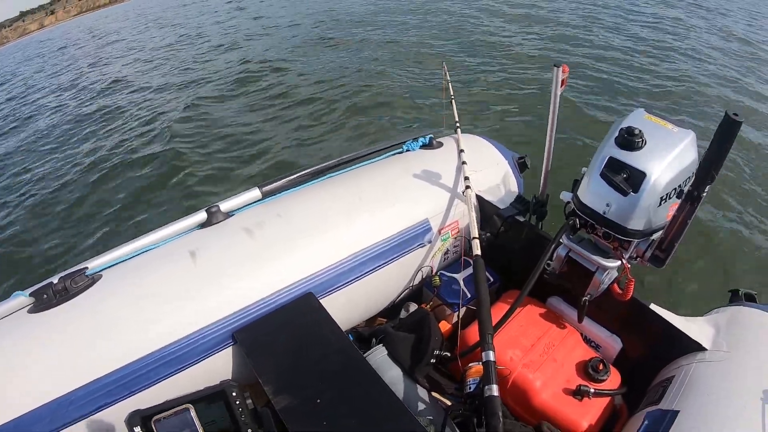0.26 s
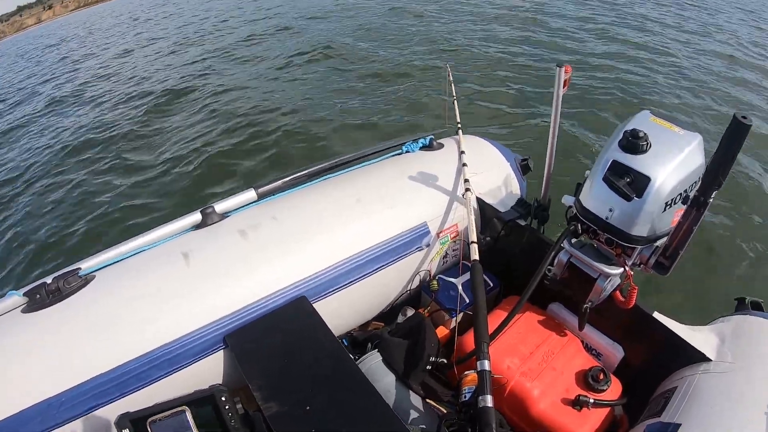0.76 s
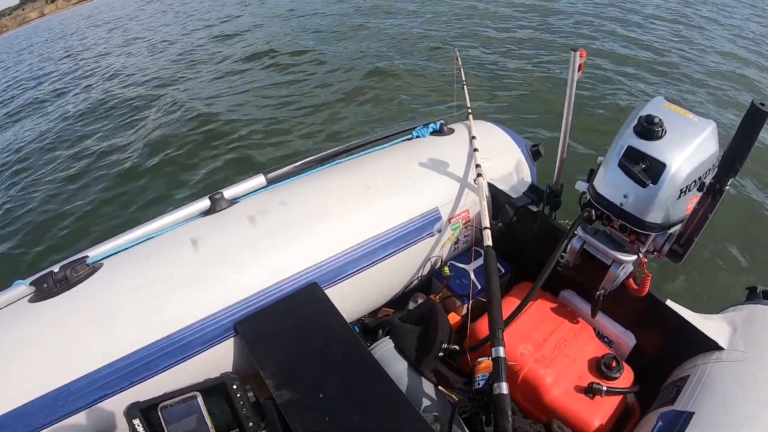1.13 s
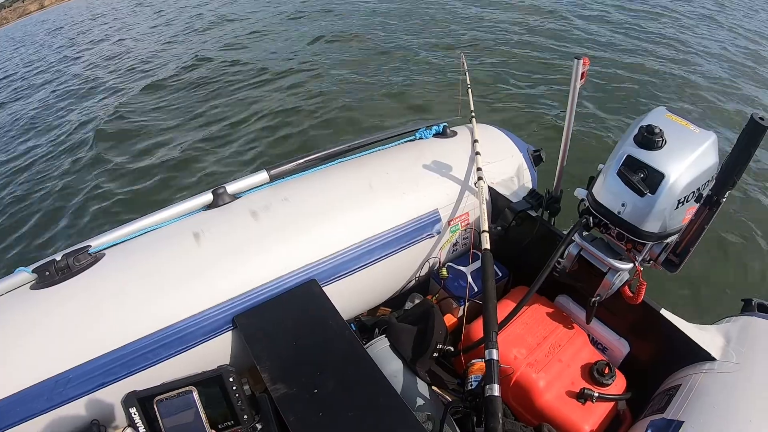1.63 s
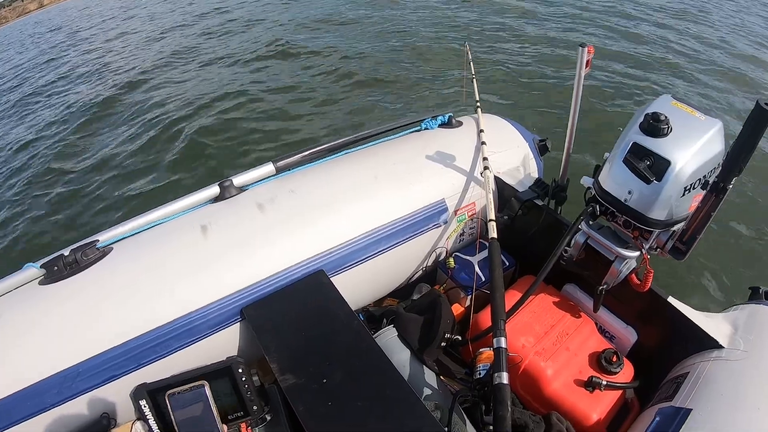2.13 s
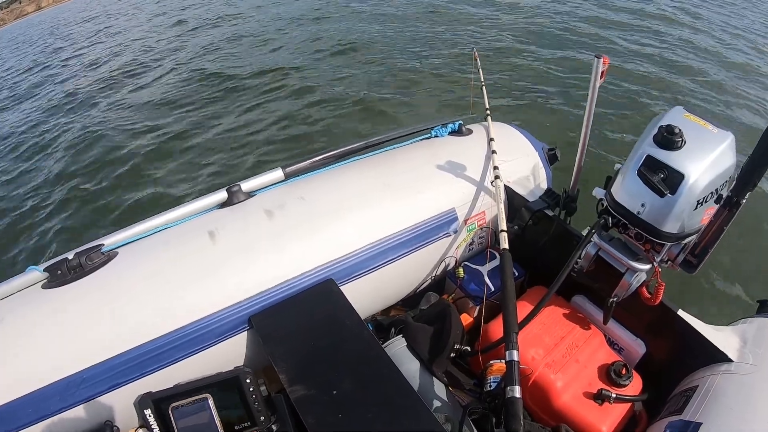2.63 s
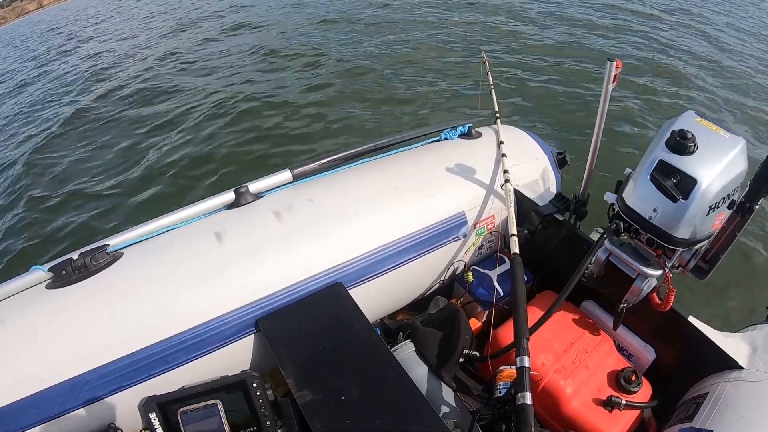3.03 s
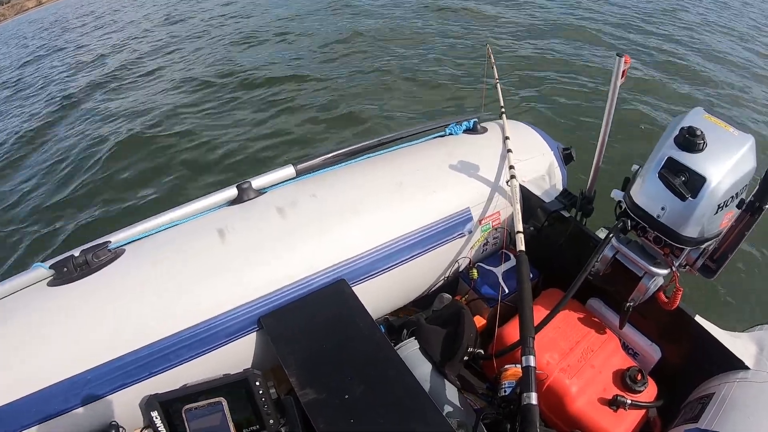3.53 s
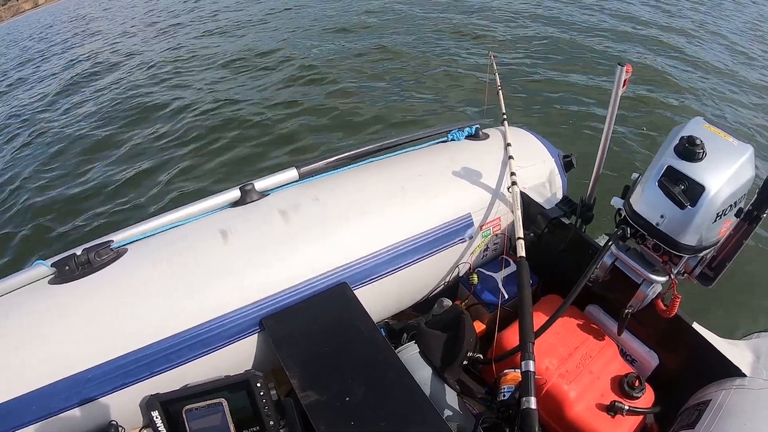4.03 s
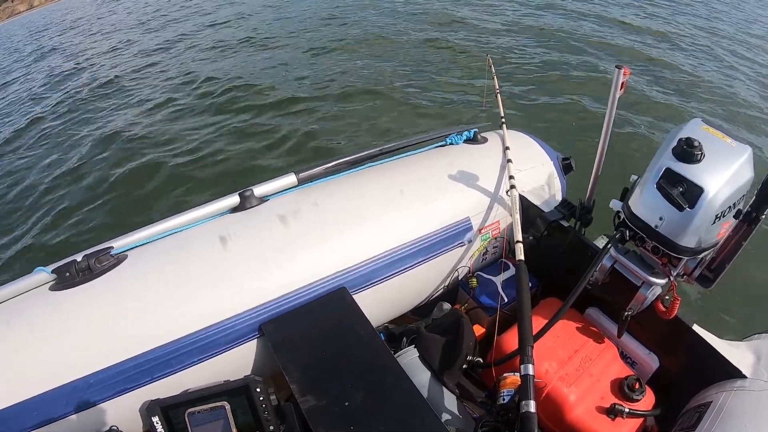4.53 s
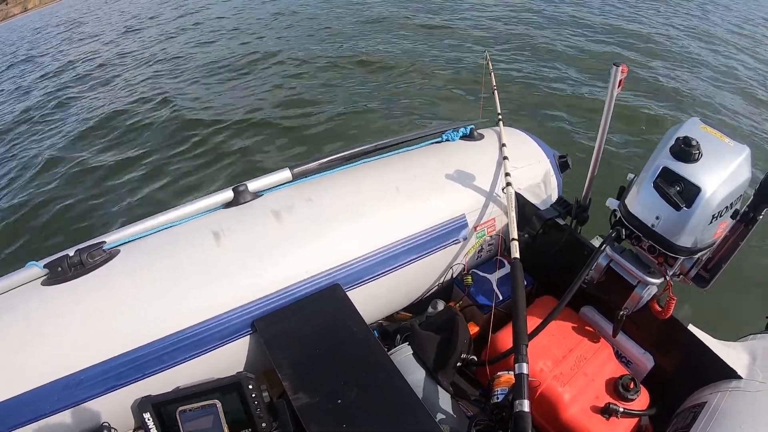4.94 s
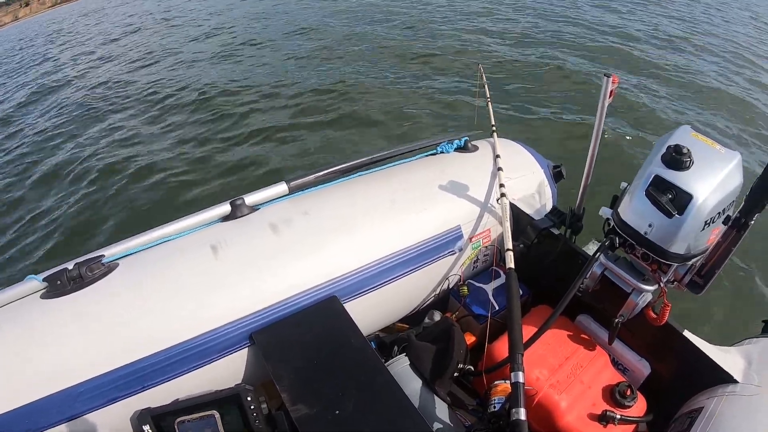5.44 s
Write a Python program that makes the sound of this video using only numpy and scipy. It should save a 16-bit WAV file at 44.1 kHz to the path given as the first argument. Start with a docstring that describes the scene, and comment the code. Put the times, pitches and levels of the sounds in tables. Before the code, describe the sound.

Three deep, ringing plops strike river water with splashing spray and bubbles, then small waves gulp softly under a boat hull.

```python
"""A paddle strikes a river three times beside an inflatable boat, with the water to the right.
Before each stroke a short hiss swells; then a torn burst of noise meets a ringing, rising plop.
Spray made of ticks, tiny ringing bubbles and fizz follows, with single bubbles, drops and soft thuds.
Then three small waves gulp under the hull as low wavering tones with slosh and spit.
A filtered-noise river, a faint low hum and a thin high hiss run throughout."""
import sys
import numpy as np
from scipy import signal
from scipy.fft import rfft, irfft
from scipy.io import wavfile
from scipy.ndimage import uniform_filter1d

SR = 44100
rng = np.random.default_rng(int(sys.argv[2]) if len(sys.argv) > 2 else 0)


def store_pcm(level_fs):
    """Save levels as 16-bit WAV."""
    pcm = np.round(np.clip(level_fs, -1, 1) * 32767).astype(np.int16)
    wavfile.write(sys.argv[1], SR, np.atleast_2d(pcm).T)


N = 250929
T = np.arange(N) / SR  # s
FREQ = np.maximum(np.fft.rfftfreq(N, 1 / SR), 1)  # Hz


def undb(db):
    """Turn decibels into a gain."""
    return 10 ** (np.asarray(db) / 20)


def unit(x):
    """Scale to rms 1."""
    return x / np.sqrt(np.mean(x ** 2))


def spectrum(points):
    """Read the gain at every frequency from (f/Hz, level/dB) points."""
    hz, db = np.transpose(points)
    return undb(np.interp(np.log(FREQ), np.log(np.maximum(hz, 1)), db))


def colour(x, gain):
    """Filter by a gain at every frequency."""
    return irfft(rfft(x) * gain, N)


def add(out, s, x):
    """Mix x into out from time s."""
    i = max(int(s * SR), 0)
    out[i:i + len(x)] += x[:max(N - i, 0)]


def hump(x):
    """A smooth bell shape, 1 at x = 0."""
    return np.exp(-np.minimum(x ** 2, 20))


def walk(rate):
    """Random levels held 1 / rate s and smoothed twice; spread near 1."""
    k = int(SR / rate)
    steps = np.repeat(rng.standard_normal(N // k + 1), k)
    return 1.3 * uniform_filter1d(uniform_filter1d(steps, k), k)[:N]


def crackle(rate, spread_db):
    """Tiny clicks of very unequal size, on average rate per second."""
    hit = rng.random(N) < rate / SR
    size_db = spread_db * np.minimum(rng.exponential(size=N), 2 * np.e)
    return hit * rng.choice([-1, 1], N) * undb(size_db)


def bubble(hz, decay, glide, onset):
    """A bubble's ring climbs by glide octaves/s and dies ever faster as it nears the surface."""
    t = np.arange(int(np.pi * decay * SR)) / SR
    size = np.exp(-(t / decay) ** np.sqrt(2)) * (1 - np.exp(-t / onset))
    return np.sin(2 * np.pi * np.cumsum(hz * 2 ** (glide * t)) / SR) * size


# air cavities dragged down by the paddle:
# (t/s of sealing, first f/Hz, final f/Hz, glide/s, nominal level/dB, decay/s, life/s)
CAVITIES = [(.279, 166.5, 782, 0.12, -1.5, 0.03, .064), (1.179, 201, 524, .025, -0.93, 0.018, .034),
            (2.0615, 226, 469.4, .012, -2.5, 0.012, 0.031)]


def plops():
    """The open cavity heaves slowly; once sealed it rings, rises in pitch and bursts at the surface."""
    open_hz, open_share = 95, .1
    draw, seal, burst = .011, .0008, .003  # s
    out = np.zeros(N)
    for s, first_hz, final_hz, glide, db, decay, life in CAVITIES:
        t = np.arange(-SR // 20, SR // 10) / SR
        age = np.maximum(t, 0)
        sealed = (1 + np.tanh(t / seal / 2)) / 2
        ring_hz = final_hz + (first_hz - final_hz) * np.exp(-age / glide)
        phase = 2 * np.pi * np.cumsum(open_hz + (ring_hz - open_hz) * sealed) / SR
        heave = (1 - sealed) * open_share * np.exp(-(t / draw) ** 2)
        size = heave + sealed * np.exp(-age / decay)
        size = size * (1 - np.tanh((t - life) / burst / 2)) / 2
        # the wave is at its crest as the neck closes
        add(out, s + t[0], undb(db) * size * np.cos(phase - np.interp(0, t, phase)))
    return out


# tone of torn water: (f/Hz, relative level/dB)
TEAR = [(240, -36.5), (400, -8), (935, -2.5), (1220, -9.5), (1490, -7), (1820, -12), (2250, -10),
        (2550, -15), (3070, -13.5), (3870, -24.5), (4440, -17.5), (6150, -19.5), (7990, -19), (9920, -41.5),
        (16000, -59.5)]


def splash(s, db, rise, decay, tilt_db, tail_db, tail):
    """Water torn open: a burst of spiky broadband noise with a brief wet tail."""
    t = np.arange(-SR // 10, 4 * SR // 10) / SR
    before, after = np.maximum(-t, 0), np.maximum(t, 0)
    fade = np.exp(-after / decay) + undb(tail_db) * np.exp(-after / tail)
    burst = np.exp(-before / rise) * fade
    hz = np.fft.rfftfreq(len(t), 1 / SR)
    gain = np.interp(hz, *np.transpose([(f, undb(level)) for f, level in TEAR]))
    gain = gain * undb(tilt_db * np.log2(np.clip(hz, 400, 9000) / 1000))
    spikes = rng.standard_normal(len(t)) ** 3
    sound = undb(db) * burst * unit(irfft(rfft(spikes) * gain, len(t)))
    # skip whatever falls before time zero
    skip = max(int(-(s + t[0]) * SR), 0)
    out = np.zeros(N)
    add(out, s + t[0], sound[skip:])
    return out


# paddle strokes and their spray: (t/s, nominal level/dB, rise/s, decay/s, tilt in dB per octave,
# churn level/dB, spray flight/s, falling spray level/dB, fizz level/dB); spray levels before clumping
STROKES = [(0.2722, -15.5, 0.0041, 0.0045, 0, -29, 0.2, -38, -54),
           (1.169, -17, 0.0053, 0.004, 0, -40, 0.2, -47, -59.5),
           (2.047, -16.5, 0.0039, 0.005, -2, -36, 0.22, -51.5, -60.5)]


def blade():
    """The blade tears the surface in a short noisy burst at each stroke."""
    return sum(splash(*row[:5], tail_db=-20, tail=.035) for row in STROKES)


# tone of pattering drops: (f/Hz, relative level/dB)
PATTER = [(240, -30.5), (400, 4), (440, -5), (623, -10), (801, -4.5), (925, -9), (1020, -5.5), (1720, -3.5),
          (2820, -6.5), (4040, -10.5), (7000, -18), (9100, -46.5), (15400, -120)]


def beads(cycles, spread_db=4.5, glide=18, count=2400):
    """A steady shower of tiny bubbles of unequal size, each ringing a few cycles; rms 1."""
    out = np.zeros(N)
    for when, size, chance in rng.random((count, 3)):
        hz = 600 * 6 ** size
        level = undb(-spread_db * np.log(chance + 0.018))
        add(out, when * N / SR, level * bubble(hz, cycles / hz, glide, 1 / hz))
    return unit(colour(out, spectrum(PATTER)))


# tone of the foam: (f/Hz, relative level/dB)
FIZZ = [(2940, -36.5), (5000, -8), (5510, -4), (6130, -8), (7940, 0.5), (9010, -5), (9930, -19),
        (12400, -24), (16000, -40.5)]


def spray():
    """Hiss swells as the blade enters; churn dies away, spray lands in a shower and foam lingers."""
    entry_patter_db, entry_fizz_db, foam_db = -54.5, -45, -5  # foam relative to the shower's fizz
    entry_patter_s, entry_fizz_s, churn_s, shower_s, foam_s = .14, .04, .038, .14, .5
    fall, foam = np.zeros(N), np.zeros(N)
    for s, *_, churn_db, flight, shower_db, fizz_db in STROKES:
        away, struck = np.abs(T - s), T >= s
        shower = hump((T - s - flight) / shower_s)
        falling = undb(churn_db) * np.exp(-away / churn_s) + undb(shower_db) * shower
        fall += np.where(struck, falling, undb(entry_patter_db) * np.exp(-away / entry_patter_s))
        fizzing = undb(fizz_db) * (shower + undb(foam_db) * np.exp(-away / foam_s))
        foam += np.where(struck, fizzing, undb(entry_fizz_db) * np.exp(-away / entry_fizz_s))
    # dry ticks, short beads, longer plips and a gurgle
    drops = undb(-8) * unit(colour(crackle(1500, 3), spectrum(PATTER)))
    drops += undb(-5) * beads(cycles=2.5)
    drops += undb(-3) * beads(cycles=6, count=2600)
    drops += undb(-10) * beads(cycles=19, spread_db=2, glide=12, count=330)
    # each size of foam bubble pops in its own band
    pops = np.zeros(N)
    for hz in np.geomspace(3500, 14000, 6):
        pops += colour(crackle(900, 3.3), np.exp(-np.log2(FREQ / hz) ** 2 * 16))
    clumps = undb(1.99 * walk(100))  # the spray falls in clumps
    return (fall * drops + foam * unit(colour(pops, spectrum(FIZZ)))) * clumps


# the largest single bubbles, and at 0.271, 1.167 and 2.044 s the ringing mouth of each torn cavity: # (t/s,
# starting f/Hz, level/dB before gain and fade-in, decay/s)
BUBBLES = [(.170, 1330, -37.5, .006), (0.271, 1440, -27, .004), (.346, 498, -29, .018),
           (.368, 592, -27, 0.013), (.524, 1040, -34, .007), (.612, 1660, -35, 0.02),
           (.863, 1290, -39.5, 0.0093), (1.042, 2196, -44.5, 0.0067), (1.167, 2450, -15, .0025),
           (1.215, 492, -33.5, .019), (1.273, 2120, -27, 0.0032), (1.344, 788, -33.5, 0.014),
           (1.437, 590, -41, 0.027), (1.464, 1520, -36, 0.0054), (1.496, 603, -43, 0.027),
           (1.510, 1180, -33, 0.0038), (2.044, 879, -17.5, .008), (2.104, 1205, -35, .01),
           (2.225, 1630, -41, 0.0046), (2.254, 2100, -37.5, 0.0063), (2.296, 1690, -44, 0.0055),
           (2.334, 1205, -40, 0.0055), (2.325, 2650, -41.5, .005), (2.355, 1260, -36.5, 0.01),
           (3.140, 660, -39, 0.019), (4.078, 1130, -47.5, 0.0088), (4.225, 1070, -40, .011),
           (4.265, 775, -41, 0.028), (5.147, 1180, -39.5, .007), (5.205, 1142, -39.5, .009),
           (5.241, 684, -35.5, 0.0072), (5.331, 710, -45.5, 0.022), (5.377, 1335, -33.5, 0.0093),
           (5.429, 775, -44, 0.0088)]


def bubbles():
    """Larger bubbles pinch off with a soft wet tick, climb in pitch and flutter as they rise."""
    climb = 5.5  # octaves per second
    gain_db, flutter_db, pinch_db, pinch_s = 1, 2, -19, .016
    rings, ticks = np.zeros(N), np.zeros(N)
    for s, hz, db, decay in BUBBLES:
        add(rings, s, undb(db) * bubble(hz, decay, climb, decay / 6))
        add(ticks, s, undb(db) * np.exp(-T[:SR // 20] / pinch_s))
    # the wobbling bubble wall jitters the pitch
    rings = np.interp(T + .00008 * walk(280), T, rings)
    wet_noise = unit(colour(crackle(8000, 1.5), spectrum(PATTER)))
    return rings * undb(gain_db + flutter_db * walk(250)) + undb(pinch_db) * ticks * wet_noise


# heavy drops landing on the river: (t/s, nominal level/dB, tilt in dB per octave)
DROPS = [(.085, -48.5, 3), (.146, -47.5, 3), (0.201, -40, 4), (0.372, -39.5, 6), (0.448, -32.5, 13),
         (0.495, -37.5, -4.5), (0.609, -30.5, 5), (1.3447, -35, -1.5), (1.598, -45, 4.5),
         (1.935, -42.5, 12.5), (2.007, -38.5, 7.5), (2.139, -43.5, 4.5), (2.266, -34.5, 5),
         (2.297, -40, 5.5), (2.409, -45.5, 1.5)]


def splats():
    """Heavy drops tear the surface in small splashes, each with its own brightness."""
    rise, decay = .0011, .0036  # s
    return sum(splash(s, db, rise, decay, tilt_db, tail_db=-20.5, tail=.04) for s, db, tilt_db in DROPS)


# air gulping under the hull as three waves pass:
# (t/s of the crest, f/Hz before wobble, boom level/dB, slosh level/dB)
GULPS = [(2.952, 169, -31, -38.5), (2.975, 171, -28, -46.5), (3.017, 181, -29, -37),
         (3.039, 174, -29, -45.5), (3.073, 161, -35.5, -44), (3.109, 150, -41, -49),
         (4.146, 155, -33.5, -49.5), (4.173, 107, -36, -53.5), (4.2, 146, -25.5, -50),
         (4.23, 152, -30.5, -47.5), (4.277, 150, -34, -61), (4.311, 160, -36.5, -64),
         (5.166, 140, -28.5, -52), (5.197, 145, -29.5, -53), (5.237, 139, -25.5, -47.5),
         (5.261, 139, -26.5, -42.5), (5.292, 139, -31.5, -67)]
# small wavelets lapping at the tube: (t/s, level/dB, decay/s)
LAPS = [(.718, -41, 0.038), (1.755, -57.5, .04), (1.915, -47, 0.017), (2.733, -47.5, 0.019)]
# tone of the slosh: (f/Hz, relative level/dB)
SLOSH = [(15, -74), (25, -32.5), (65, -20.5), (151, -12), (301, -16.5), (404, -21), (469, -22),
         (614, -57.5), (695, -25), (981, -31.5), (1140, -38), (1570, -55.5), (9000, -63), (11700, -87.5),
         (19800, -120)]


def hull():
    """Wavelets squeeze an air pocket under the tube: it booms while water sloshes, spits and runs off."""
    gulp_rise, gulp_fall, lap_rise, runoff_s = .011, .016, .0045, .12  # s
    spit_db, runoff_db = -10, -16  # relative to the slosh
    boom, wet, laps = np.zeros(N), np.zeros(N), np.zeros(N)
    for s, _, db, wet_db in GULPS:
        push = hump(np.maximum((s - T) / gulp_rise, (T - s) / gulp_fall))
        boom += undb(db) * push
        wet += undb(wet_db) * push
    for s, db, decay in LAPS:
        laps += undb(db) * np.exp(-np.minimum(np.maximum((s - T) / lap_rise, (T - s) / decay), 20))
    times, pitches = np.transpose(GULPS)[:2]
    hz = np.interp(T, times, pitches) * (1 + .055 * walk(70))
    tone = np.sin(2 * np.pi * np.cumsum(hz) / SR)
    slosh = unit(colour(crackle(3300, 3.5), spectrum(SLOSH)))
    # the run-off repeats the slosh's swell a little later
    spit = undb(spit_db) * (wet + laps) + undb(runoff_db) * np.interp(T - runoff_s, T, wet)
    return boom * tone + (wet + laps) * slosh + spit * beads(cycles=3.8, count=3600)


# wavelets slapping the tube: (t/s, nominal level/dB)
SLAPS = [(1.692, -46), (2.9462, -28.5), (3.007, -30.5), (3.0404, -34), (3.066, -44), (4.209, -46.5),
         (4.391, -57), (5.035, -42), (5.379, -41.5)]


def slaps():
    """Wavelets slap the tube in very short bursts of torn-water noise."""
    rise, decay, tilt_db = .00031, .002, -2.5  # s, s, dB per octave
    return sum(splash(s, db, rise, decay, tilt_db, tail_db=-20, tail=.06) for s, db in SLAPS)


# dull thuds of the boat's floor: (t/s, f/Hz, level/dB, half length/s)
KEEL = [(2.111, 136, -35, 0.04), (2.187, 54.5, -55, 0.033), (3.062, 78, -36.5, 0.013),
        (3.13, 66.5, -51, 0.035)]


def thuds():
    """The boat's soft floor booms briefly, as low tones, when water heaves against it."""
    out = np.zeros(N)
    for s, hz, db, width in KEEL:
        out += undb(db) * hump((T - s) / width) * np.sin(2 * np.pi * hz * (T - s))
    return out


# tone of the open water: (f/Hz, relative level/dB)
RIVER = [(15, -53.5), (25, -17.5), (74, -20.5), (114, -29), (141, -11), (195, -4.5), (236, -9.5),
         (285, -10), (309, -25.5), (363, -14.5), (439, -29), (545, -20), (2550, -39), (8360, -46.5),
         (16000, -63.5)]
# stereo width of the open water: (f/Hz, side against mid level/dB)
RIVER_SIDE = [(60, -5.5), (110, -9), (200, -11.5), (380, -6), (700, 6), (1290, 3.5), (2380, -1),
              (4400, -4.5), (8120, -1.5), (15000, 2)]
# the faint hum: (f/Hz before wobble, level/dB before the hum's trim, waver and swell)
HUM = [(199.2, -74.5), (360.7, -81), (479.1, -89), (559.9, -92.5)]
# rise and fall of river, hum and hiss together: (t/s, level/dB)
SWELL = [(0, 3), (1, -3.5), (1.8, -3.5), (2.4, 1.5), (3.3, 0), (5.69, -1.5)]


def river():
    """A wide wash of rippling filtered noise, a faint wavering hum and a thin high hiss."""
    wash_db, ripple_db, hum_db, waver_db, hiss_db = -64.5, 1.8, -2, 3, -90  # before the swell
    hiss_hz, hiss_width_hz = 8300, 550

    def wash():
        """Noise in the river's tone with a rippling level."""
        return unit(colour(rng.standard_normal(N), spectrum(RIVER))) * undb(ripple_db * walk(24))

    mid, side = wash(), colour(wash(), spectrum(RIVER_SIDE))
    hum = np.zeros(N)
    for hz, db in HUM:
        phase = 2 * np.pi * np.cumsum(hz * (1 + .005 * walk(30))) / SR
        hum += undb(db + waver_db * walk(4.8)) * np.sin(phase)
    band = 1 / (1 + ((FREQ - hiss_hz) / hiss_width_hz) ** 2)
    hiss = np.array([unit(colour(rng.standard_normal(N), band)) for _ in range(2)])
    background = undb(wash_db) * np.array([mid + side, mid - side])
    # sqrt(2) turns a sine's rms level into its peak
    background = background + undb(hum_db) * np.sqrt(2) * hum + undb(hiss_db) * hiss
    return background * undb(np.interp(T, *np.transpose(SWELL)))


def boat(x, echo_db, low_hz, decay=.017):
    """A short diffuse scatter off the tubes, floor and motor, thinned below low_hz."""
    response = rng.standard_normal(N) * np.exp(-np.minimum(T / decay, 20)) * (T > .003)
    thin = FREQ ** 2 / (FREQ ** 2 + low_hz ** 2)
    return undb(echo_db) * colour(x, rfft(response) / np.sqrt(np.sum(response ** 2)) * thin)


# left port against the right one: (f/Hz, level/dB)
PORT_LEVEL = [(60, -2.5), (300, 2), (480, -2.9), (700, -11), (1000, -16.5), (2400, -16), (4400, -11.5),
              (6000, -7), (8200, -13.5), (13000, -6.5)]
# left port against the right one: (f/Hz, phase/rad)
PORT_PHASE = [(0, 0), (300, -.27), (500, -.75), (700, -1.35), (1200, -3.9), (3200, -3.65), (6000, -3.3),
              (8200, -4.6), (15000, -6.2)]


def scene():
    """The near water reaches the right port first; the left one is shaded."""
    water = plops() + blade() + spray() + bubbles() + splats() + hull() + slaps() + thuds()
    turn = np.exp(1j * np.interp(FREQ, *np.transpose(PORT_PHASE)))
    left = colour(water, spectrum(PORT_LEVEL) * turn)
    left = left + boat(water, echo_db=-16, low_hz=885)
    right = water + boat(water, echo_db=-17.5, low_hz=836)
    return np.array([left, right]) + river()


def record(dry):
    """The recorder cuts steeply above 15800 Hz."""
    return signal.sosfilt(signal.ellip(8, .2, 70, 15800, fs=SR, output="sos"), dry)


dry = scene()
out = record(dry)
store_pcm(out)
```